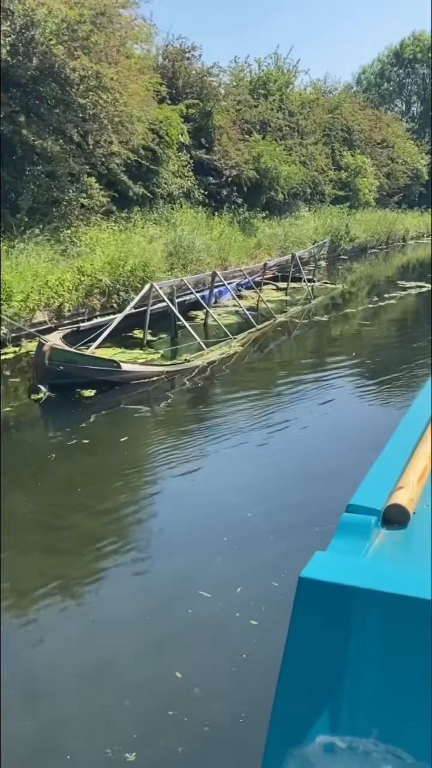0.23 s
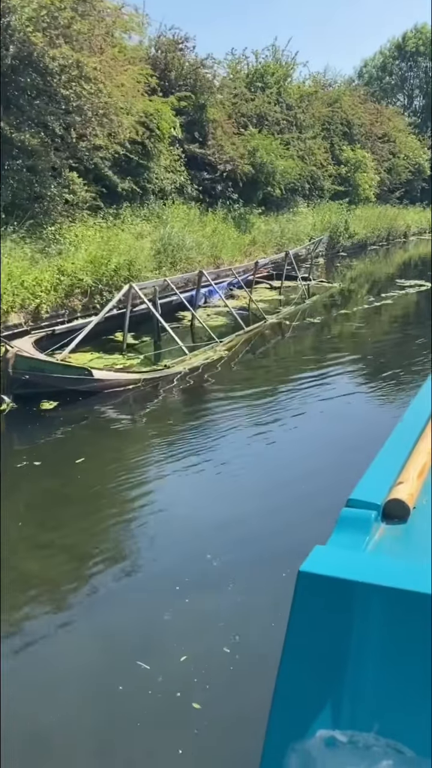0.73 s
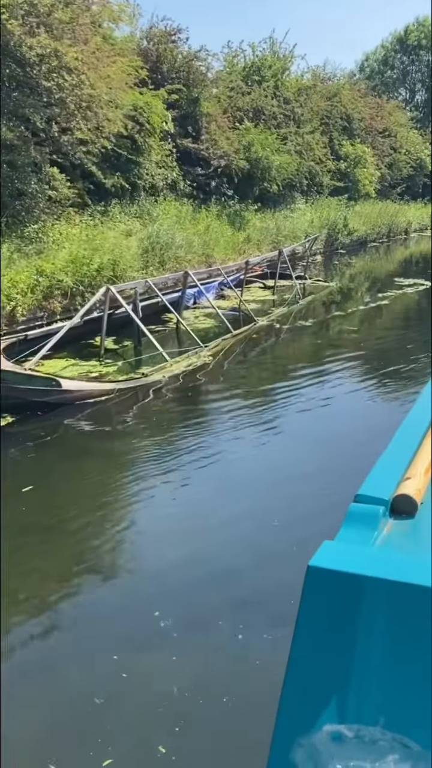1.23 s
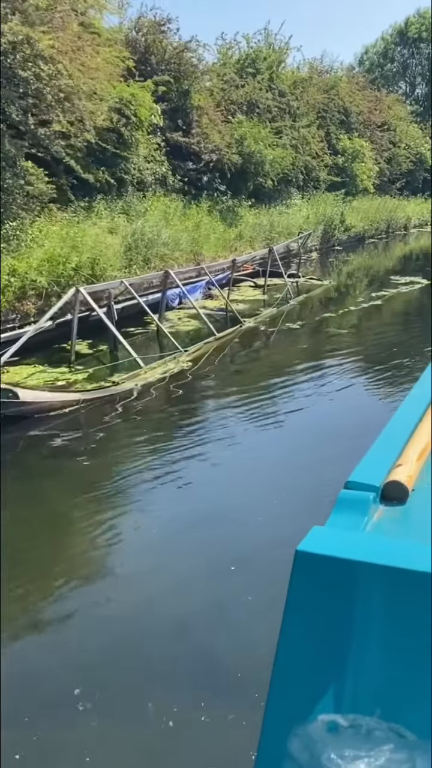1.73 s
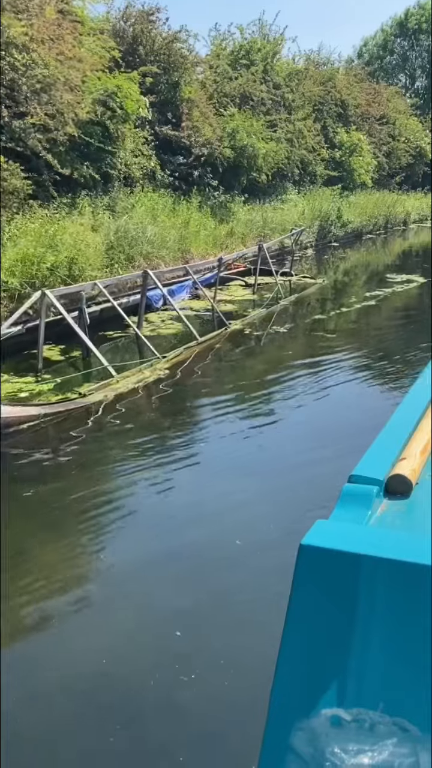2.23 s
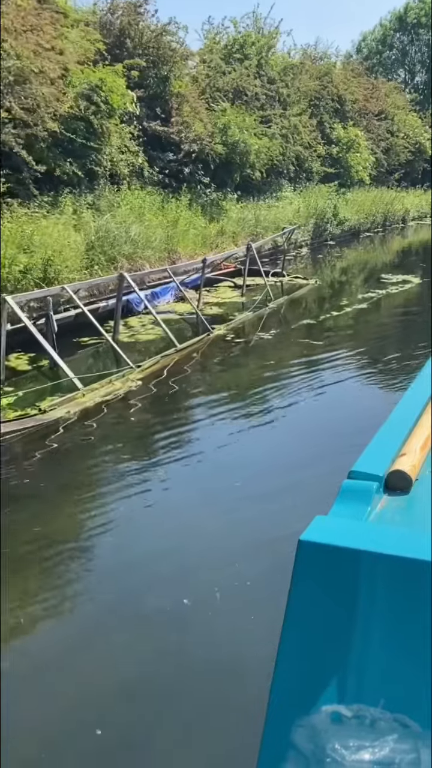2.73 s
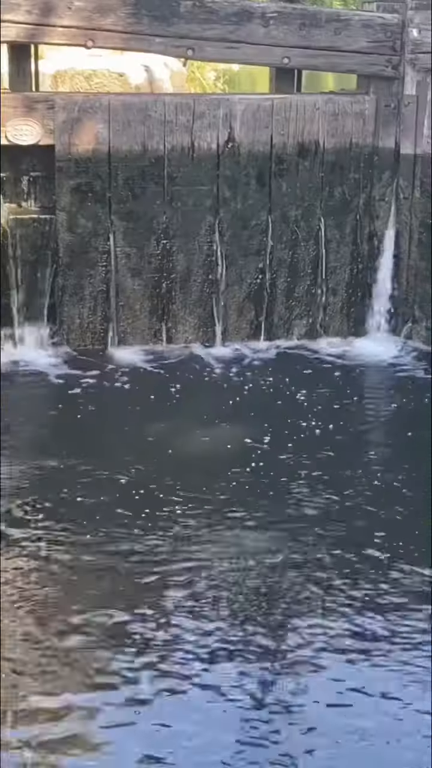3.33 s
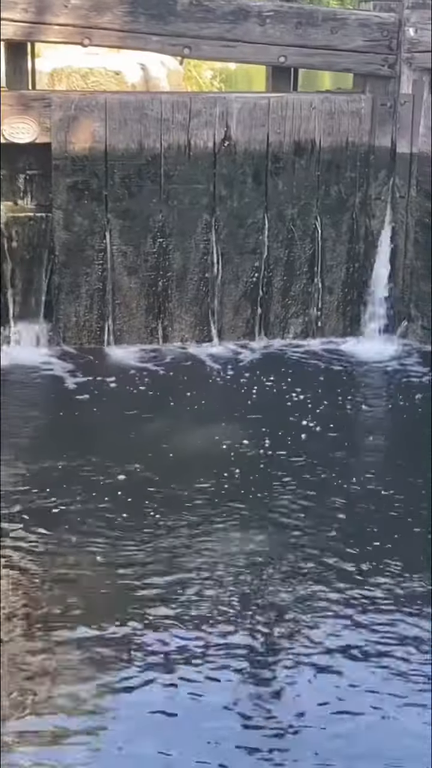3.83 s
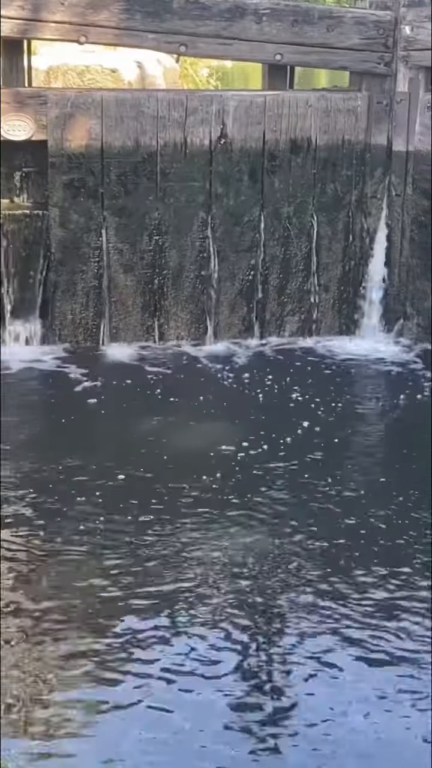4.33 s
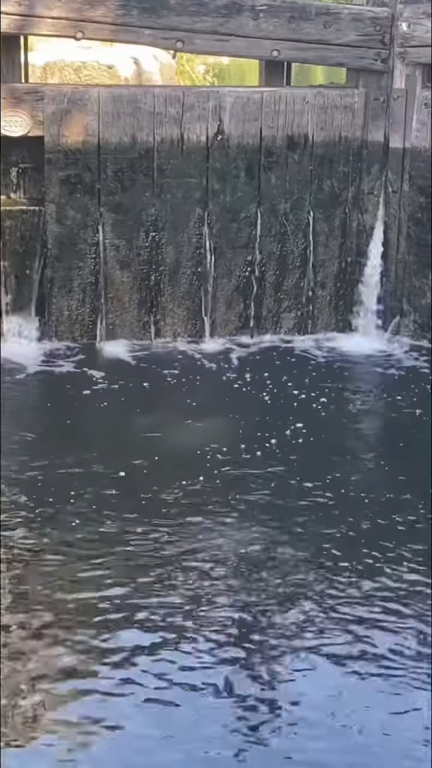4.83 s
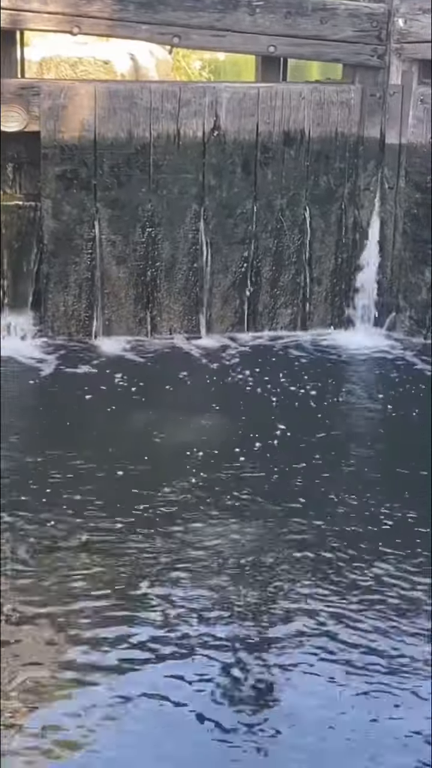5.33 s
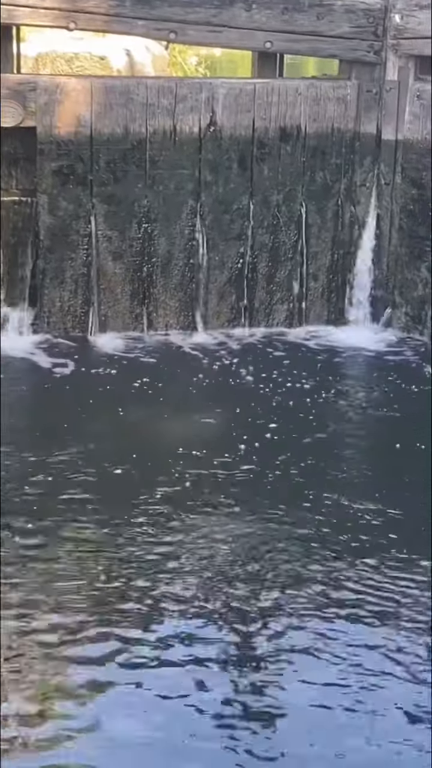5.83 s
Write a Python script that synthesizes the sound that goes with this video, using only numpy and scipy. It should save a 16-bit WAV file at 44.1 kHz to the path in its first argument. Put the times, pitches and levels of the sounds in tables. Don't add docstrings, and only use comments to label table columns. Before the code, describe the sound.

Low hull rumble and birdsong drift along a quiet canal, then a cut to loud water pouring through lock gates over an idling diesel.

```python
import sys
import numpy as np
from scipy import signal
from scipy.fft import rfft, irfft
from scipy.io import wavfile
from scipy.ndimage import uniform_filter1d

SR = 44100
rng = np.random.default_rng(int(sys.argv[2]) if len(sys.argv) > 2 else 0)


def nominal_scale(level):
    x = np.asarray(level, float) / 20
    return 10 ** x


def master_out(mix):
    frames = np.transpose(np.atleast_2d(mix))
    ceiling = np.clip(frames, -1, 1)
    pcm = np.round(ceiling * 32767).astype(np.int16)
    wavfile.write(sys.argv[1], SR, pcm)


N = 267731
TIME = np.arange(N) / SR
HZ = np.fft.rfftfreq(N, 1 / SR)


def rms_one(x):
    return x / np.sqrt(np.mean(x ** 2) + 1e-20)


def coloured(x, spectrum):
    hz, level_db = np.transpose(spectrum)
    gain_db = np.interp(np.log(HZ + 1), np.log(hz), level_db, left=-60)
    return rms_one(irfft(rfft(x) * nominal_scale(gain_db), N))


def drift(rate):
    step = 40
    r = np.exp(-2 * np.pi * step * rate / SR)
    noise = rng.standard_normal(N // step + 2002)
    slow = signal.lfilter([1], [1, -2 * r, r * r], noise)[2000:]
    return np.interp(np.arange(N) / step, np.arange(len(slow)), rms_one(slow))


def swells(calm_db, starts, holds, peaks_db, rise_s, fall_s):
    after = TIME - np.reshape(starts, (-1, 1))
    before_hold = np.maximum(-after, 0) / rise_s
    past_hold = np.maximum(after - np.reshape(holds, (-1, 1)), 0) / fall_s
    bells = np.exp(-2 * (before_hold + past_hold) ** 2)
    return 10 * np.log10(nominal_scale(2 * calm_db) + nominal_scale(2 * np.array(peaks_db)) @ bells)


def resonate(x, hz, width_hz):
    r = np.exp(-np.pi * width_hz / SR)
    poles = [1, -2 * r * np.cos(2 * np.pi * hz / SR), r * r]
    return signal.lfilter(np.array([1, 0, -1]) * (1 - r * r) / 2, poles, x)


def patchy_noise(shared_db, own_db, rate):
    white = rng.standard_normal((2, 2, N))
    together = drift(rate / 2)
    edges = 20 * 2. ** np.arange(11) * np.append(np.ones(10), .95)
    out = 0
    for k, (low, high) in enumerate(zip(edges, edges[1:])):
        band = irfft(rfft(white[k % 2]) * ((HZ >= low) & (HZ < high)), N)
        out = out + band * nominal_scale(shared_db * together + own_db * drift(rate))
    return out


def microphones(field, pair):
    hz_per_turn = 6000
    hz, *columns = np.transpose(pair)
    lead, alike, balance_db = [np.interp(HZ, hz, c) for c in columns]
    lead = lead - 2 * np.pi * np.maximum(HZ - hz[-1], 0) / hz_per_turn
    alike = np.clip(alike, 0, 1)
    direct, diffuse = rfft(field) * np.sqrt([(1 + alike) / 2, (1 - alike) / 2])
    turn = np.exp(.5j * lead) * nominal_scale(-balance_db / 2)
    return irfft(np.array([(direct + diffuse) / turn, (direct - diffuse) * turn]), N)


def tone(start, seconds, pitch_hz, level_db):
    after = TIME - start
    gain = nominal_scale(np.interp(after, seconds, level_db, left=-200, right=-200))
    phase = 2 * np.pi * np.cumsum(np.interp(after, seconds, pitch_hz)) / SR
    return np.sqrt(2) * gain * np.sin(phase)


def banks(dry, wet_db):
    t = np.arange(SR // 4) / SR
    tail = rng.standard_normal((2, SR // 4)) * nominal_scale(-60 * t / .4)
    tail = tail / np.sqrt(np.sum(tail[0] ** 2))
    return nominal_scale(wet_db) * signal.fftconvolve(dry[None], tail, axes=1)[:, :N]


def hull():
    # f/Hz, bandwidth/Hz, level/dB
    hull_modes = [(66, 23.5, 4), (73.1, 14, -1.5)]
    # f/Hz, bandwidth/Hz, level/dB
    buffet_modes = [(144, 36, -1.5), (195.7, 27, 1.5), (282, 48, -7)]
    # t/s, hold/s, boom level/dB, buffeting level/dB
    gusts = [(0.01, .02, -42.5, -45), (.36, 0.025, -51, -43.5), (0.508, 0.077, -52, -46.5),
             (.66, .04, -46, -49), (.78, 0.12, -46, -52), (.96, .10, -54, -41.5), (1.082, 0.1, -40, -41),
             (1.33, 0.025, -38.5, -37.5), (1.435, .10, -51, -45), (1.562, 0.046, -56, -46),
             (1.759, 0.017, -44, -42), (1.92, 0.022, -45, -51), (2.06, .02, -42.5, -55),
             (2.176, .07, -41.5, -49), (2.407, .02, -42, -50), (2.518, .04, -47, -49),
             (2.646, 0.02, -39.5, -50), (2.77, .02, -41, -56), (2.864, .08, -44, -54)]
    starts, holds, boom_peaks_db, buffet_peaks_db = np.transpose(gusts)
    rise_s, fall_s = 0.031, 0.048
    boom_db = swells(-50, starts, holds, boom_peaks_db, rise_s, fall_s)
    buffet_db = swells(-52.5, starts, holds, buffet_peaks_db, rise_s, fall_s)
    rumble_band = signal.butter(2, [35, 340], "band", fs=SR, output="sos")
    layers = 0
    for modes, level_db in ((hull_modes, boom_db), (buffet_modes, buffet_db)):
        shake = rng.standard_normal((2, N))
        body = 0
        for k, (hz, width, db) in enumerate(modes):
            body = body + nominal_scale(db) * resonate(shake, hz, width) * (-1) ** k / np.sqrt(width)
        body = rms_one(signal.sosfilt(rumble_band, body))
        body = body / np.sqrt(uniform_filter1d(body ** 2, size=SR // 12) + 0.035)
        layers = layers + nominal_scale(level_db) * body
    return layers


def traffic():
    # f/Hz, level/dB per Hz
    hum = [(250, 1.5), (320, -3.5), (420, -5.5), (600, -3.5), (1000, -4), (1400, -12), (2000, -24),
           (2600, -56.5)]
    peak_s, pass_s = 1.93, 0.99
    level_db = -56 + 3 / (1 + ((TIME - peak_s) / pass_s) ** 2)
    return nominal_scale(level_db + 8.5) * coloured(patchy_noise(shared_db=-1.0, own_db=0.54, rate=6.6), hum)


def foliage():
    # t/s, hold/s, level/dB
    rustles = [(0, .01, -83), (0.107, 0.018, -106), (.23, .03, -92), (.37, .18, -92.5), (.65, .03, -87),
               (.86, .04, -97), (1.16, .04, -88), (1.34, .12, -98), (1.555, .04, -95), (1.85, .28, -88.5),
               (2.31, 0.046, -92), (2.49, .05, -94), (2.794, 0.054, -92), (2.937, .05, -91)]
    # f/Hz, level/dB per Hz
    leaf_spectrum = [(1400, -24), (2000, 5), (2800, 1), (4000, -2), (5200, -3.5), (6500, -13), (8500, -29),
                     (10000, -45), (14000, -76)]
    # f/Hz, level/dB per Hz
    reed_spectrum = [(6000, -10), (8000, 0), (10000, -3), (12000, -7), (13600, -9), (14300, -24),
                     (16000, -34)]
    calm_db, leaves_follow = -105, 0.17
    reeds_db = swells(calm_db, *np.transpose(rustles), rise_s=0.022, fall_s=.025)
    leaves_db = -67 + leaves_follow * (reeds_db - calm_db)
    leaves = coloured(patchy_noise(shared_db=1.0, own_db=.8, rate=14.), leaf_spectrum)
    reeds = coloured(patchy_noise(shared_db=2.5, own_db=3.0, rate=25.), reed_spectrum)
    return nominal_scale(leaves_db) * leaves + nominal_scale(reeds_db + 4.5) * reeds


def far_birds():
    # t/s, length/s, start f/Hz, end f/Hz, level/dB
    whistles = [(.20, .04, 3250, 3250, -74), (.275, .04, 2480, 2500, -72), (.61, .05, 2480, 2600, -70),
                (.65, .05, 2150, 2350, -70), (.68, .06, 2650, 3050, -70), (.74, .05, 2350, 2450, -72),
                (.86, .05, 3150, 3350, -72), (.825, .07, 2650, 2800, -69), (1.04, .05, 2850, 2850, -69),
                (1.205, .025, 4850, 4150, -75), (1.26, .045, 2950, 2980, -71), (1.30, .03, 3250, 3250, -73),
                (1.49, .06, 2900, 3300, -70), (1.93, .04, 4800, 4000, -76), (2.085, .05, 2980, 2960, -70),
                (2.12, .04, 3300, 3250, -71), (2.24, .04, 3250, 3300, -72), (2.52, .10, 3250, 3200, -75),
                (2.64, .12, 3050, 2900, -76), (2.30, .10, 2330, 2270, -66), (2.67, .035, 3900, 4400, -78)]
    # f/Hz, level/dB
    chatter = [(2450, -76), (2800, -75), (3250, -76), (3700, -78), (4150, -79)]
    share, swell_db = np.array([[0, .25, .75, 1], [-15, 0, -2, -15]])
    dry = np.zeros(N)
    for s, length, first_hz, last_hz, db in whistles:
        dry += tone(s, length * share, first_hz + (last_hz - first_hz) * share, db + swell_db)
    for hz, db in chatter:
        singing = np.clip(2 * drift(12) - .5, 0, 1)
        pitch = hz * (1 + .07 * drift(5) + .02 * drift(60))
        dry += nominal_scale(db) * singing * np.sin(2 * np.pi * np.cumsum(pitch) / SR)
    dry *= nominal_scale(4 * drift(80) - 3)
    return dry + banks(dry, 0.5)


def warbler():
    # t/s after start, f/Hz, level/dB
    drop_low = [(0, 6700, -22), (.010, 5500, -9), (.018, 4500, -1), (.026, 4130, 0), (.046, 3920, -3),
                (.072, 4120, -4), (.088, 3750, -6), (.108, 3250, -12), (.118, 3150, -30)]
    # t/s after start, f/Hz, level/dB
    drop_high = [(0, 6900, -22), (.011, 5400, -7), (.019, 4800, 0), (.036, 4570, -2), (.068, 4800, -8),
                 (.082, 4450, -6), (.100, 3600, -11), (.114, 3250, -30)]
    # t/s after start, f/Hz, level/dB
    stair = [(0, 6500, -16), (.010, 5800, -6), (.020, 5480, 0), (.042, 5250, -3), (.062, 4100, -2),
             (.076, 3740, -2), (.100, 3480, -5), (.112, 3350, -25)]
    DROP_LOW, DROP_HIGH, STAIR = drop_low, drop_high, stair
    # t/s, note shape, level/dB, full voice/s
    song = [
        (.301, DROP_LOW, -57.5, .08),
        (0.693, DROP_LOW, -58, .10),
        (1.077, DROP_HIGH, -55.5, .10),
        (1.437, STAIR, -65, .05),
        (1.802, DROP_HIGH, -58, .065),
        (2.158, STAIR, -64.5, .04),
        (2.553, DROP_LOW, -57.5, .11),
        (2.932, DROP_LOW, -55, .08),
    ]
    trail_db_per_s = 160
    dry = 0
    for s, shape, db, full in song:
        trail_db = trail_db_per_s * np.maximum(TIME - s - full, 0)
        dry = dry + nominal_scale(db - trail_db) * tone(s, *np.transpose(shape))
    dry = nominal_scale(1.2 * drift(40)) * dry
    return dry * np.array([[1], [.22]]) + banks(dry, -15)


def canal():
    # f/Hz, right leads/rad, likeness/0-1, left minus right/dB
    canal_pair = [(300, 0, .98, -.2), (480, -.1, .93, -.3), (650, -.1, .82, 3.4), (1000, .55, .83, 4.9),
                  (2000, .45, .65, 0), (2600, 2.6, .6, -.6), (3900, 3.14, .62, 1.2), (5600, 4.8, .73, .8),
                  (7300, 3.14, .8, 0)]
    return microphones(hull() + traffic() + foliage() + warbler(), canal_pair) + far_birds()


def bubbles(per_s, low_hz, high_hz):
    sizes = nominal_scale(3.0 * np.minimum(rng.exponential(1, (2, N)), 4)) * rng.choice([-1, 1], (2, N))
    born = rng.random((2, N)) < per_s * nominal_scale(3.0 * drift(7)) / SR
    pitches = np.geomspace(low_hz, high_hz, 14)
    dealt = rng.integers(0, 14, N)
    ringing = 0
    for k, hz in enumerate(pitches):
        ringing = ringing + resonate(sizes * born * (dealt == k) + 1e-18, hz, hz / 7.6)
    return rms_one(ringing)


def falling_jets():
    # f/Hz, level/dB per Hz
    jet_spectrum = [(25, -28), (45, -19), (80, -10), (140, -8.5), (200, -9.5), (330, -5), (450, -8),
                    (600, -13.5), (1000, -9.5), (1600, -14), (2800, -16), (3600, -21.5), (6500, -25.5),
                    (16000, -33.5)]
    # t/s, hold/s, gurgle re roar level/dB
    surges = [
        (3.50, .04, 4),
        (3.771, 0.057, 0),
        (4.31, 0.014, -0.5),
        (4.446, 0.026, 1.5),
        (4.592, 0.034, 3),
        (5.05, .05, -2),
    ]
    calm_db, roar_follows, bubbles_per_s = -3.5, 0.068, 2000
    gurgle_db = swells(calm_db, *np.transpose(surges), rise_s=0.034, fall_s=0.044)
    roar_db = -33.5 + roar_follows * (gurgle_db - calm_db)
    roar = coloured(patchy_noise(shared_db=0.0, own_db=1.14, rate=8.9), jet_spectrum)
    spray = signal.sosfilt(signal.butter(2, 3500, "high", fs=SR, output="sos"), roar)
    roar = roar + (nominal_scale(2.5) - 1) * spray
    fizz = nominal_scale(-9.5) * bubbles(bubbles_per_s, low_hz=484, high_hz=1853)
    pockets = bubbles(bubbles_per_s / 12., low_hz=194.6, high_hz=425)
    return nominal_scale(roar_db + 2.5) * (roar + fizz + nominal_scale(gurgle_db - 10.0) * pockets)


def diesel():
    # multiple of the cycle rate, level/dB rms
    engine_tones = [(4, -41.5), (7, -45.5), (8, -54), (9, -46), (10, -44.5), (11, -43.5), (12, -40),
                    (13, -44.5), (14, -54), (15, -48), (16, -37.5), (20, -44.5), (28, -45.5), (40, -49)]
    cycle_hz, cycle_start = 7.885, .22
    turns = 2 * np.pi * (cycle_start + np.cumsum(cycle_hz * (1 + 0.0014 * drift(0.49))) / SR)
    tones = 0
    for k, db in engine_tones:
        waver_db = (2.2 if k > 4 else 1) * drift(6)
        phase = rng.uniform(0, 7) * (k % 4 > 0)
        tones = tones + nominal_scale(db + waver_db) * np.cos(k * turns + phase)
    return np.sqrt(2) * tones * np.array([[1], [0]])


def lock():
    # f/Hz, right leads/rad, likeness/0-1, left minus right/dB
    lock_pair = [(200, 0, .9985, 0), (540, -.1, .988, 0), (750, 0, .985, 3.4), (1500, 0, .99, 3.8),
                 (1700, -.1, .9, 0), (2550, -.6, .93, 0), (3500, 0, .92, 0), (4350, -.55, .87, 0),
                 (5100, -.15, .89, 0), (7300, -3.14, .78, 0), (10650, -6.28, .86, 0)]
    return microphones(falling_jets() + nominal_scale(-1.5) * diesel(), lock_pair)


def scene():
    cut_s, fade_out_s, fade_in_s = 3.001, 0.027, 0.034
    fade_out = np.clip((cut_s - TIME) / fade_out_s, 0, 1)
    fade_in = np.clip((TIME - cut_s) / fade_in_s, 0, 1)
    return fade_out * canal() + fade_in * lock()


def joint_stereo(x):
    band_edges = [80, 88, 96, 108, 120, 132, 144, 160, 176, 196, 216, 240, 264, 292, *range(320, 705, 32),
                  733, 1025]
    lead = 1024 - 352
    pair = np.pad(np.array([x[0] + x[1], x[0] - x[1]]) / 2, ((0, 0), (lead, 0)))
    window = np.sin(np.pi * (np.arange(2048) + .5) / 2048)
    lines = signal.stft(pair, window=window, nperseg=2048)[2]
    for low, high in zip(band_edges, band_edges[1:]):
        power = uniform_filter1d(np.mean(np.abs(lines[:, low:high]) ** 2, axis=1), size=2)
        masked_db = -6.3 if low > 250 else np.array([[-99], [-10.5]])
        floor_db = -119 + 3.0 * (low > 570) + 6.0 * (low > 630)
        unmasked = power > power[::-1] * nominal_scale(2 * masked_db)
        kept = unmasked & (power > nominal_scale(2 * floor_db)) & (high < 1025)
        lines[:, low:high] *= kept[:, None]
    mid, side = signal.istft(lines, window=window, nperseg=2048)[1][:, lead:lead + N]
    return np.array([mid + side, mid - side])


def top_cut(x):
    return signal.sosfilt(signal.butter(12, 15960, fs=SR, output="sos"), x)


def record(dry):
    cut = signal.sosfilt(signal.butter(4, 24, "high", fs=SR, output="sos"), dry)
    mix = joint_stereo(cut)
    return top_cut(mix)


dry = scene()
out = record(dry)
master_out(out)
```